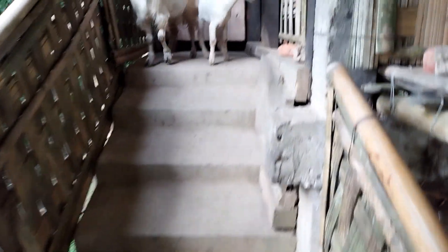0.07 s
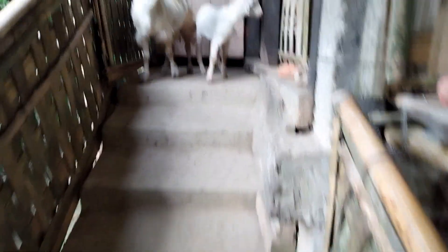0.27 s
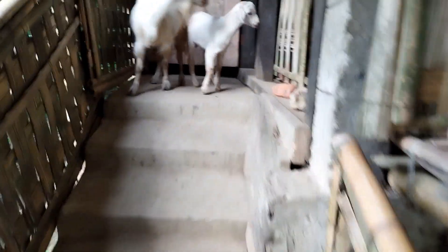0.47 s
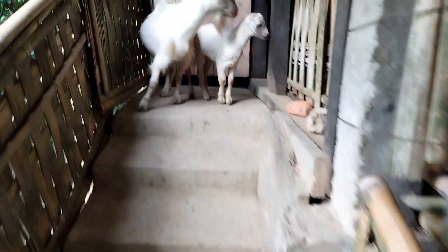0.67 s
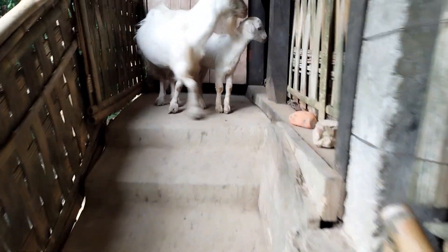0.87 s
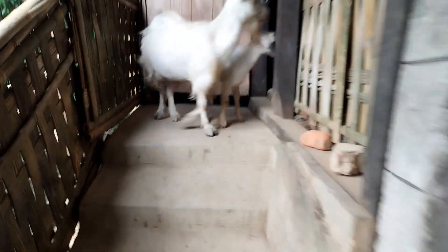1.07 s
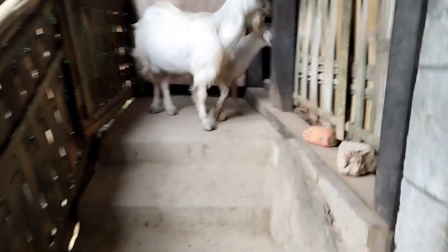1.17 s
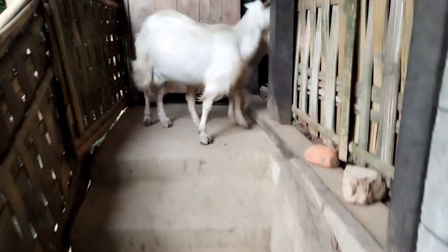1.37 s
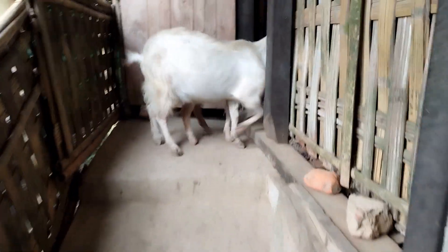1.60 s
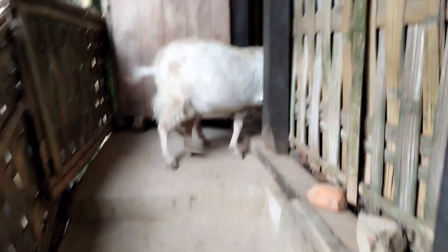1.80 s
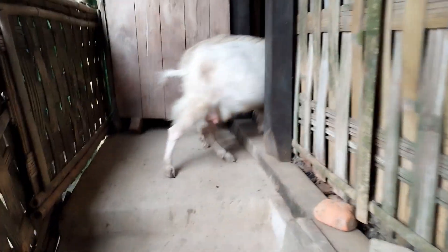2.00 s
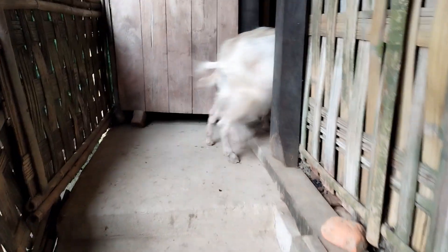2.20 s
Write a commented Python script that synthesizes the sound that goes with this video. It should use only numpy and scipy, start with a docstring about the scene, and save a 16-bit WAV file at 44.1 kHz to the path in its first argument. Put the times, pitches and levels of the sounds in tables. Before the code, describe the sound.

Footsteps scuff and thud on gritty concrete steps, with light hoof taps and faint insects.

```python
"""A farm yard, on gritty concrete steps. Someone climbs: soles scuff, weight thuds down, grit cracks.
Goats shuffle off the landing, their hooves tapping the concrete and knocking a wooden door frame.
Fences and walls give the steps a short, dull tail. Behind them insects hiss steadily, something like
a far bird calls once, and the hand-held microphone rumbles over a bed of air and a faint drone."""
import sys
import numpy as np
from scipy import signal
from scipy.fft import rfft, irfft
from scipy.io import wavfile

SR = 44100
rng = np.random.default_rng(int(sys.argv[2]) if len(sys.argv) > 2 else 0)


def transcribe(u):
    """Save the signal u as a 16-bit wav file named by the first command-line argument.

    u: samples, shape (n,) or (channels, n), limited to [-1, 1]; the rate is SR.
    q: integer samples, one column per channel.
    """
    v = np.clip(np.atleast_2d(u).T, -1, 1)
    q = np.round(v * 32767).astype(np.int16)
    wavfile.write(sys.argv[1], SR, q)


N = 99225
TIME = np.arange(N) / SR


def from_db(db):
    """Decibels to gain."""
    return 10 ** (np.asarray(db) / 20)


def rms_one(x):
    """Scale to rms 1."""
    return x / np.sqrt(np.mean(x ** 2) + 1e-20)


def lowpass(x, hz):
    """Gentle treble roll-off."""
    return signal.sosfilt(signal.butter(2, min(hz, .45 * SR), fs=SR, output="sos"), x + 1e-18)


def band_noise(low_hz, high_hz):
    """Steady noise between two edges; rms 1."""
    sos = signal.butter(2, [max(low_hz, 10), min(high_hz, .45 * SR)], "band", fs=SR, output="sos")
    return rms_one(signal.sosfilt(sos, rng.standard_normal(2 * N))[N:])


def equalise(x, curve, tilt_db=0):
    """Apply an EQ curve, tilted per octave from its second point up; rms 1."""
    octave = np.log2(np.maximum(np.fft.rfftfreq(N, 1 / SR), 10))
    hz, db = np.transpose(curve)
    eq_db = np.interp(octave, np.log2(hz), db) + tilt_db * np.maximum(octave, np.log2(hz[1]))
    return rms_one(irfft(rfft(x) * from_db(eq_db), N))


def envelope(start, attack, hold, t60):
    """Linear attack, hold, then exponential decay; all in seconds."""
    age = TIME - start
    return np.clip(age / max(attack, 1e-5), 0, 1) * from_db(-60 * np.clip((age - attack - hold) / t60, 0, 4))


def sine(hz, start, phase=0):
    """A sine with the given phase at its start time."""
    return np.sin(2 * np.pi * hz * (TIME - start) + phase)


# Slides on grit: (time [s], attack [s], hold [s], t60 [s], level [dB], tilt [dB/octave])
SCUFF_CUES = [(0.045, 0.0016, 0.0033, 0.078, -46, 6.5), (.241, 0.0013, 0.0054, 0.024, -33, -1.5),
              (0.245, 0.0017, 0.017, 0.094, -30, 1.5), (0.399, .01, 0.056, 0.15, -50.5, -1),
              (0.546, 0.003, 0.013, 0.1, -59.5, -2), (.655, 0.0018, .008, 0.071, -58, -0.5),
              (0.751, 0.0011, 0.0067, 0.1, -47.5, 4.5), (0.927, .001, 0.027, 0.093, -30.5, 0.5),
              (1.245, 0.0022, .010, 0.088, -42, -2), (1.297, .005, 0.018, 0.14, -58.5, -.5),
              (1.472, .001, 0.0034, 0.045, -49, 5), (1.553, 0.0023, 0.0046, 0.037, -49.5, 9),
              (1.678, 0.0026, 0.021, 0.14, -54, -3), (1.743, 0.0036, 0.01, 0.14, -49.5, 0),
              (1.786, 0.0024, 0.0044, 0.1, -38.5, -2.5), (1.7905, 0.0027, 0.0015, 0.01, -33, -2),
              (1.901, 0.0015, 0.023, 0.36, -53.5, -4), (1.939, 0.0018, 0.0042, 0.14, -47, -.5),
              (2.004, 0.03, 0.0095, 0.18, -43, -2), (2.142, 0.0087, 0.03, 0.096, -55.5, -4.5)]
# Tone of the grit: (frequency [Hz], relative level [dB])
GRIT_EQ = [(100, -5.5), (220, -6), (600, -6.5), (1150, -4), (1900, 0.5), (3000, 1), (4200, 0.5), (5600, 3),
           (7300, 3), (9000, 5), (10500, -3.5), (12500, -11), (16000, -16.5)]

def scuffs(grains_per_s=6000, spread_db=3, hiss_gain=0.62):
    """Thousands of grains a second crunch under a sliding sole or hoof."""
    out = np.zeros(N)
    for start, attack, hold, t60, db, tilt_db in SCUFF_CUES:
        sizes = from_db(spread_db * np.minimum(rng.exponential(1, N), 4)) * rng.choice([-1, 1], N)
        grains = rms_one(sizes * (rng.random(N) < grains_per_s / SR))
        grit = grains + hiss_gain * rng.standard_normal(N)
        out += from_db(db) * envelope(start, attack, hold, t60) * equalise(grit, GRIT_EQ, tilt_db)
    return out


# Weight landing on a step: (time [s], level [dB], pitch [Hz], puff t60 [s])
THUD_CUES = [(.242, -44.5, 229, 0.035), (0.2844, -25.5, 380, 0.033), (.2865, -36, 190, 0.081),
             (0.3132, -38.5, 130, 0.057), (0.446, -37.5, 472, 0.094), (.929, -39.5, 190, 0.049),
             (.9295, -36.5, 803, 0.037), (.962, -35.5, 467, 0.042), (0.965, -45, 154, .06),
             (.982, -40.5, 201, 0.13), (1.246, -37, 208, 0.029), (1.472, -44, 460, 0.098),
             (1.476, -47.5, 199, 0.42), (1.789, -38, 416, 0.062), (1.907, -37, 154, 0.12),
             (1.996, -40, 450, 0.11), (2.02, -40, 370, 0.18)]

def thuds(attack_s=0.0016, t60_cycles=8.6, half_width_octaves=0.9):
    """Each landing is a damped low push with a dull puff of noise around its pitch."""
    out = np.zeros(N)
    edge = 2 ** half_width_octaves
    for start, db, hz, t60 in THUD_CUES:
        push = -sine(hz, start) * envelope(start, attack_s, 0, t60_cycles / hz)
        puff = band_noise(hz / edge, hz * edge) * envelope(start, attack_s, 0, t60)
        out += from_db(db) * (0.75 * push + 0.34 * puff)
    return lowpass(out, hz=1710)


# Grit snaps and small hard taps: (time [s], level [dB], ring [Hz], crack against ring [dB])
SNAP_CUES = [(0.2895, -8, 9100, -19.5), (0.2999, -28.5, 7450, -4), (0.3135, -41.5, 2980, 11),
             (0.7518, -32.5, 5450, -17), (1.507, -45.5, 1960, 2), (1.738, -34, 5000, -5),
             (1.839, -44.5, 2970, -2.5)]

def grit_snaps():
    """A grain breaks underfoot: a few cycles of bright ring and a broadband crack."""
    out = np.zeros(N)
    for start, db, hz, crack_db in SNAP_CUES:
        ring = sine(hz, start) * envelope(start, 0.00008, 0, t60=0.0018)
        crack = band_noise(260, 11000) * envelope(start, 0.0001, 0, t60=0.0031)
        out += from_db(db) * (ring + from_db(crack_db) * crack)
    return lowpass(out, hz=11200)


# Hooves on concrete: (time [s], level [dB])
HOOF_CUES = [(1.247, -43.5), (1.255, -51), (1.788, -43), (1.791, -40)]
# Ring of a hoof: (frequency [Hz], relative level [dB], t60 [s])
HOOF_RING = [(860, -8.5, 0.043), (1479, -0.5, 0.032), (1820, 2, 0.03), (2126, 0, 0.034), (2780, 3, 0.028),
             (3190, -1, 0.027), (4810, -9, 0.045)]

def hoof_taps(spread_db=1.5):
    """Hard horn strikes concrete and rings briefly, each mode varying in level and phase per hit."""
    out = np.zeros(N)
    for start, db in HOOF_CUES:
        for hz, mode_db, t60 in HOOF_RING:
            phase, offset_db = rng.standard_normal(2) * (np.pi, spread_db)
            ring = sine(hz, start, phase) * envelope(start, 0.00033, 0, t60)
            out += from_db(db + mode_db + offset_db) * ring
    return out


# Hooves on the door frame: (time [s], level [dB], decay scale [ratio])
KNOCK_CUES = [(1.5308, -50, 0.96), (1.901, -54.5, 0.88), (1.997, -53.5, .35)]
# Ring of the frame: (frequency [Hz], relative level [dB], t60 [s])
FRAME_MODES = [(446, 1.5, 0.12), (672, 1.5, 0.11), (792, -3.5, 0.12), (1050, 2, .11), (1355, -3.5, 0.095),
               (1540, -14, 0.067), (1690, -1.5, 0.073)]

def frame_knocks(clack_db=2, clack_t60_s=0.074):
    """Each hoof blow is a dull clack that sets the wooden frame ringing."""
    out = np.zeros(N)
    for start, db, decay in KNOCK_CUES:
        ring = np.zeros(N)
        for k, (hz, mode_db, t60) in enumerate(FRAME_MODES):
            mode = sine(hz, start) * envelope(start, 0.00034, 0, t60 * decay)
            ring += (-1) ** k * from_db(mode_db) * mode
        clack = band_noise(1170, 1640) * envelope(start, 0.00049, 0, clack_t60_s * decay)
        out += from_db(db) * (ring + from_db(clack_db) * clack)
    return out


def yard_reverb(x, wet_db=-20):
    """Fences and walls throw back a short, dull tail."""
    tail = lowpass(rng.standard_normal(N), hz=5050) * envelope(0.0022, 0.0065, 0, t60=0.18)
    return from_db(wet_db) * signal.fftconvolve(x, tail / np.sqrt(np.sum(tail ** 2)))[:N]


# Insect chorus and its shrillest voice: (centre [Hz], width [Hz], level [dB], flutter [dB])
CHORUS_BANDS = [(6783, 310, -62.5, 2), (8400, 1100, -59, 1.5), (9210, 710, -59, 1.5),
                (10320, 1020, -54.5, 1)]
SHRILL_BAND = (9358, 257, -56.5, 1.5)
# Their fader rides, each applied about its own mean: (time [s], level [dB])
CHORUS_RIDE = [(0.0, -47.5), (0.86, -48), (0.98, -49), (1.23, -48.5), (1.47, -48), (2.25, -47)]
SHRILL_RIDE = [(0.0, -55.5), (0.86, -54.5), (0.99, -57.5), (1.18, -66), (1.5, -61), (2.12, -52.5),
               (2.25, -51.5)]

def insects(top_hz=11700):
    """Far insects hiss in narrow fluttering bands; the shrillest dips and swells on its own."""
    def fader(ride):
        times, db = np.transpose(ride)
        return from_db(np.interp(TIME, times, db - db.mean()))

    def voice(hz, width, level_db, flutter_db):
        gain = from_db(level_db + flutter_db * band_noise(4.2, 93))
        return gain * band_noise(hz - width / 2, hz + width / 2)

    chorus = fader(CHORUS_RIDE) * sum(voice(*band) for band in CHORUS_BANDS)
    shrill = fader(SHRILL_RIDE) * voice(*SHRILL_BAND)
    return signal.sosfilt(signal.butter(18, top_hz, fs=SR, output="sos"), chorus + shrill)


# Arch of the far call: (time [s], pitch [Hz], level [dB])
CALL_CONTOUR = [(.47, 1010, -100), (.52, 1090, -68.5), (.57, 1190, -76), (.62, 1235, -67), (.69, 1230, -84),
                (.76, 1216, -76), (0.851, 1100, -75.5), (0.891, 1063, -72)]
# Its harmonics 1 to 5: (relative level [dB])
CALL_HARMONICS = [3, -7, -12, -15, -15]

def far_bird(pitch_jitter=0.011, flutter_db=3, brighten_db=4):
    """One faint, hoarse, fluttering cry whose overtones brighten at the top of its arch."""
    times, hz, db = np.transpose(CALL_CONTOUR)
    pitch = np.interp(TIME, times, hz) * (1 + pitch_jitter * band_noise(13, 130))
    phase = 2 * np.pi * np.cumsum(pitch) / SR
    arch = np.clip(np.interp(TIME, times, (hz - hz.mean()) / (hz.max() - hz.mean())), -1, 1)
    cry = np.zeros(N)
    for k, harmonic_db in enumerate(CALL_HARMONICS, 1):
        motion_db = brighten_db * arch * (k > 1) + flutter_db * band_noise(10, 45)
        cry += from_db(harmonic_db + motion_db) * np.sin(k * phase)
    return from_db(np.interp(TIME, times, db, left=-140, right=-140)) * cry


# Bumps on the microphone: (time [s], width [s], level [dB], frequency [Hz])
JOLT_CUES = [(.31, .05, -58, 55), (1.76, 0.06, -49, 50.4), (1.995, 0.038, -43.5, 49)]

def handling_rumble():
    """The hand jolts the microphone: soft swells of deep rumble."""
    out = np.zeros(N)
    for centre, width, db, hz in JOLT_CUES:
        swell = np.exp(-0.5 * ((TIME - centre) / width) ** 2)
        out += from_db(db) * swell * band_noise(hz * 0.46, hz * 1.19)
    return out


# Tone of the open air: (frequency [Hz], relative level [dB])
AIR_EQ = [(20, 4.5), (45, 1), (80, -4), (150, -11.5), (300, -19.5), (600, -19.5), (1200, -23.5),
          (2500, -26), (5000, -26), (8000, -20), (11000, -17.5), (12500, -29), (16000, -35)]

def yard_air(level_db=-55.5):
    """A steady noise bed, heavy in the lows."""
    return from_db(level_db) * equalise(rng.standard_normal(N), AIR_EQ)


# Notes of the drone: (centre [Hz], level [dB])
DRONE_BANDS = [(135, -73), (196, -74), (380, -77.5)]

def drone(width_hz=20.7):
    """A faint hum that wavers because each note is a narrow band of noise."""
    return sum(from_db(db) * band_noise(hz - width_hz / 2, hz + width_hz / 2) for hz, db in DRONE_BANDS)


def scene():
    """Mono mix: feet and hooves up front with the yard's tail, the ambience behind."""
    steps = scuffs() + thuds() + grit_snaps() + frame_knocks() + hoof_taps()
    ambience = yard_air() + drone() + insects() + handling_rumble() + far_bird()
    return (steps + yard_reverb(steps) + ambience)[None]


def record(dry):
    """A steep high cut on the whole mix."""
    cutoff_hz = 15900
    return signal.sosfilt(signal.ellip(12, .1, 80, cutoff_hz, fs=SR, output="sos"), dry)


dry = scene()
out = record(dry)
transcribe(out)
```